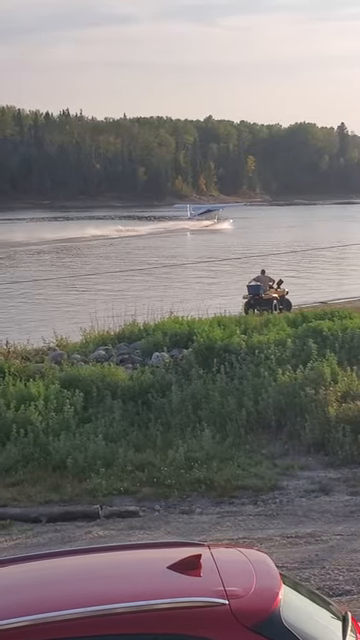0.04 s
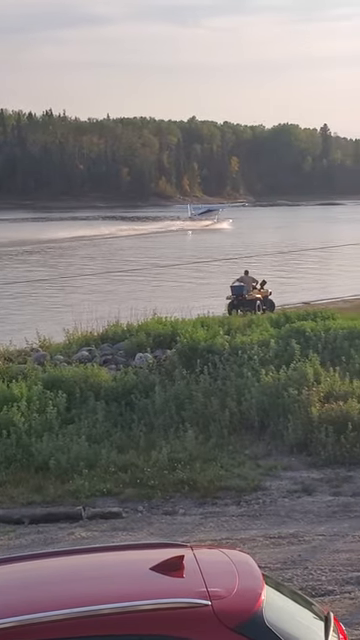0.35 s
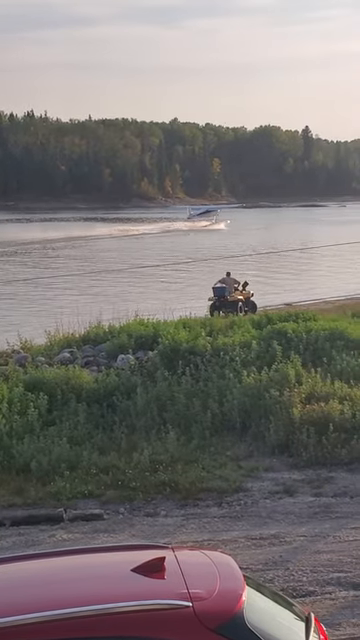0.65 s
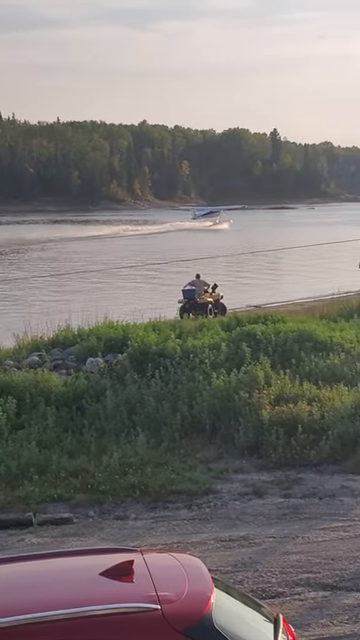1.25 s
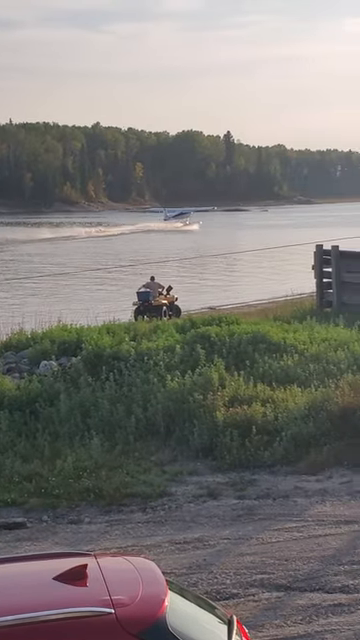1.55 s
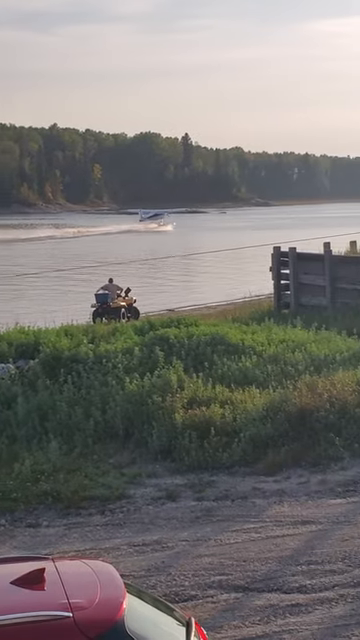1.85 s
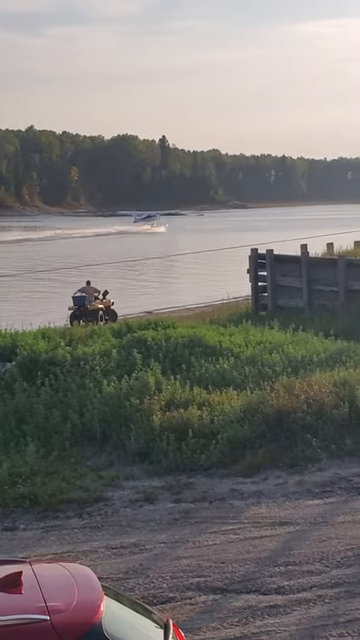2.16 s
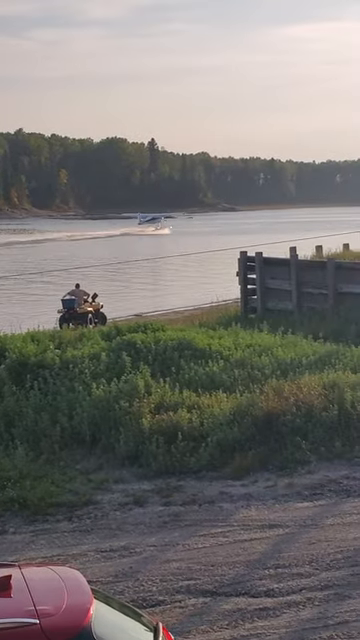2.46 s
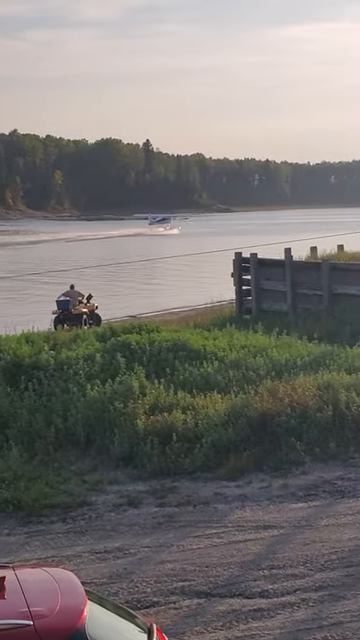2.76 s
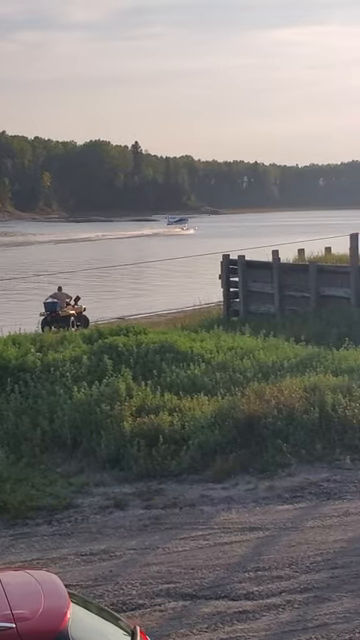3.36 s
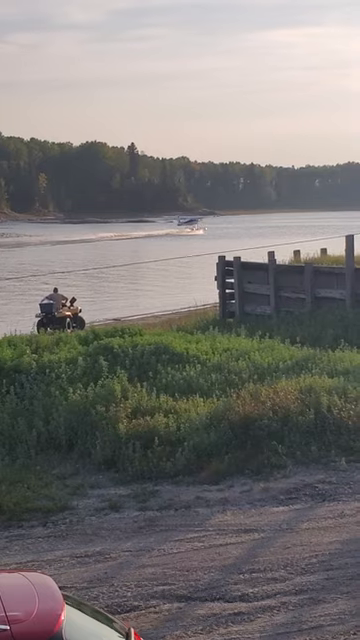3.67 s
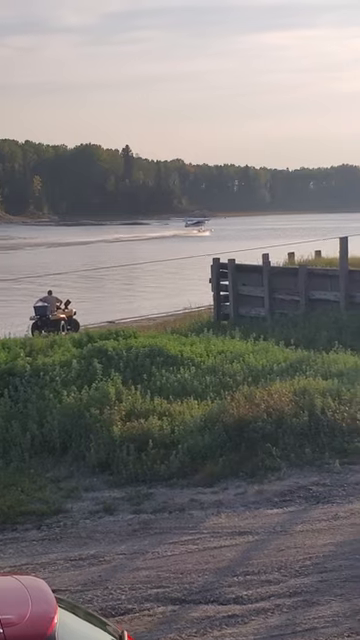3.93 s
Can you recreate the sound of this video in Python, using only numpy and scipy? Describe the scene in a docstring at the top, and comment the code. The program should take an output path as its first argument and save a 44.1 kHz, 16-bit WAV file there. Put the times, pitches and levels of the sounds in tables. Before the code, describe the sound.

Steady propeller drone of a far-off seaplane on the water, with a faint hiss of spray.

```python
"""A floatplane's four-cylinder engine and propeller drone far out on a wide river as it runs to take off.
Heard from the bank, the drone is lowered in pitch because the plane moves away (the Doppler effect),
and it fades in and out. Unequal cylinders add a lumpy beat, and the exhaust rasps with each firing.
The wooded far shore returns the drone higher and smeared, so the two beat against each other.
Beneath them the propeller's wash roars and spray hisses off the floats; a few faint ticks sound nearby."""
import sys
import numpy as np
from scipy import signal
from scipy.fft import rfft, irfft, next_fast_len
from scipy.io import wavfile

SR = 44100
rng = np.random.default_rng(int(sys.argv[2]) if len(sys.argv) > 2 else 0)


def transcribe(signal):
    """Save signal, clipped to [-1, 1], as a 16-bit WAV file at the path in sys.argv[1]."""
    frames = np.atleast_2d(signal).T
    limited = np.clip(frames, -1, 1)
    pcm = np.round(limited * 32767).astype(np.int16)
    wavfile.write(sys.argv[1], SR, pcm)


N = 176400
TIME = np.arange(N) / SR  # seconds
FREQS = np.arange(N // 2 + 1) * SR / N  # Hz

# How often the engine fires and a blade passes, as heard. Each row: time in seconds, rate in Hz.
FIRING_RATE = [(0, 83.19), (.5, 83.22), (1, 83.2), (1.8, 83.08), (2.4, 83.31), (3, 83.15), (3.5, 82.6),
               (4, 82.58)]
# Loudness of the three lowest harmonics (tones at 1, 2 and 3 times the firing rate).
# Each row: time in seconds, level in dB.
FIRST_HARMONIC = [(0, -14.5), (.22, -13.5), (.4, -16), (.54, -21), (.8, -17), (1.1, -18), (1.25, -18),
                  (1.5, -20), (1.65, -17), (1.88, -15), (2.1, -19.5), (2.5, -19.5), (2.68, -22),
                  (2.9, -20.5), (3.3, -19), (3.65, -25.5), (4, -23)]
SECOND_HARMONIC = [(0, -33.5), (.35, -32), (.55, -32.5), (.8, -24), (1.05, -27), (1.251, -22), (1.5, -23),
                   (1.75, -24.5), (2.1, -27), (2.449, -27.5), (2.649, -23), (3.001, -24), (3.3, -21),
                   (3.619, -22.5), (3.77, -19.5), (4, -26)]
THIRD_HARMONIC = [(0, -34), (.25, -29), (.42, -22.5), (.85, -24.5), (1.13, -30.5), (1.26, -22.5),
                  (1.36, -23.5), (1.55, -22), (1.85, -20.5), (2.2, -21.3), (2.5, -22), (2.67, -23.5),
                  (2.799, -22), (3.1, -23.5), (3.5, -25), (3.681, -28.5), (3.8, -21.5), (3.9, -31),
                  (3.96, -21.5)]
# Strength of the higher harmonics. Each row: frequency in Hz, relative level in dB.
BUZZ_COLOUR = [(332, -41), (415, -38.5), (498, -55), (581, -48), (664, -43), (748, -42.5), (880, -51),
               (1250, -55), (1570, -55), (1900, -53.5), (2250, -57.5), (2600, -57.5), (3500, -59)]

def engine_drone(phase):
    """Each blade pass and firing makes a suction pulse: three strong low tones and a buzz above."""
    turn = np.exp(1j * phase)  # turn ** k is harmonic number k
    levels = (FIRST_HARMONIC, SECOND_HARMONIC, THIRD_HARMONIC)
    low = sum(undb(curve(rows)) * turn ** k for k, rows in enumerate(levels, 1))
    mean_hz = np.mean(np.array(FIRING_RATE)[:, 1])
    half_blurred_hz = 1760
    buzz = 0
    for k in range(4, 37):
        blur = (k * mean_hz / half_blurred_hz) ** 2  # churning air blurs high tones most
        fading = (flutter() + blur * wander(width_hz=8)) / np.hypot(1, blur)
        tone = turn ** k * np.exp(2j * np.pi * rng.random())
        buzz += colour(BUZZ_COLOUR, k * mean_hz) * fading * tone
    return -np.sqrt(2) * (low + buzz * undb(-2) * ramp(db_per_s=1.6)).real


# Tones of the lumpy beat. Each row: multiple of a quarter of the firing rate, relative level in dB.
LOPE_TONES = [(3, -40.5), (5, -44), (6, -27.5), (7, -32.5), (9, -46.5), (10, -38.5), (11, -37), (13, -39),
              (14, -58), (15, -40), (18, -39.5), (19, -53.5), (21, -54), (22, -52), (23, -56), (27, -50)]

def cylinder_lope(phase):
    """The four cylinders fire unequally, which adds tones between the drone's harmonics."""
    looseness = 0.48  # 0 gives one stronger knock per cycle, 1 spreads it over the cycle
    peak_s, fall_db_per_s = 2.22, 3
    tones = 0
    for k, db in LOPE_TONES:
        fading = flutter()
        offset = np.pi * (1 + looseness * rng.uniform(-1.01, 1))
        tones += undb(db) * (fading * np.exp(1j * (round(k) * phase / 4 + offset))).real
    return np.sqrt(2) * tones * undb(-2.5 - fall_db_per_s * abs(TIME - peak_s))


# Tone of the exhaust. Each row: frequency in Hz, relative level in dB.
RASP_COLOUR = [(600, -80), (1200, -72.5), (1500, -61), (1750, -66), (1950, -67.5), (2300, -85), (2900, -79),
               (3400, -82), (4500, -90.5), (7000, -100), (12000, -115)]
# How the rasp swells and fades on its way. Each row: time in seconds, gain in dB.
RASP_SWELL = [(0, 0), (.45, 3), (.75, 0), (.95, 1), (1.35, -10.5), (1.8, -4.5), (2.25, -1.5), (2.6, -7),
              (3.2, -1.5), (3.8, -18), (4, -8)]

def exhaust_rasp(phase):
    """Exhaust gas hisses out in one puff per firing."""
    puffs = noise(colour(RASP_COLOUR, FREQS), likeness=0.8) * (1 + 0.46 * np.cos(phase))
    return from_left(puffs, lead_ms=0.19) * undb(curve(RASP_SWELL))


# Strength of the echo's harmonics. Each row: frequency in Hz, relative level in dB.
ECHO_COLOUR = [(86, -35.5), (173, -32.5), (260, -33), (346, -34.5), (432, -43), (519, -45), (605, -42),
               (692, -40.5), (780, -41.5), (865, -43), (1040, -42), (1215, -41), (1300, -45), (1550, -45.5),
               (1900, -47.5), (2400, -70)]
# How the echo's upper growl comes and goes along the bank. Each row: time in seconds, gain in dB.
ECHO_SWELL = [(0, 1.5), (.6, -1), (1.05, -1), (1.4, -0.5), (1.9, -1), (2.3, 0.5), (2.7, 0), (3, -1.5),
              (3.55, 0.5), (3.87, 1.5), (4, 1.5)]

def shore_echo():
    """Countless trees each return the drone at a slightly different pitch: tones become noise bands."""
    pitch_hz, blur_hz, spread_hz = 86.47, 3.24, 0.54
    power = 0
    for k in range(1, 27):
        width_hz = np.hypot(blur_hz, k * spread_hz)  # higher harmonics smear more
        band = bell(FREQS - k * pitch_hz, width_hz) / (width_hz * np.sqrt(2 * np.pi))
        power += colour(ECHO_COLOUR, k * pitch_hz) ** 2 * band
    likeness = 0.92 + 0.08 * np.exp(-(FREQS / 450) ** 4)
    echo = from_left(noise(np.sqrt(power), likeness), lead_ms=0.12) * undb(-1)
    low = filtered(echo, lambda hz: 1 / (1 + (hz / 460) ** 6))
    return low * ramp(db_per_s=-0.35) + (echo - low) * undb(curve(ECHO_SWELL))


# Tone of the air behind the propeller. Each row: frequency in Hz, relative level in dB.
WASH_COLOUR = [(20, -76), (32, -70), (48, -59.5), (100, -59), (200, -55), (300, -65.5), (400, -62.5),
               (480, -68.5), (560, -72.5), (650, -62), (850, -60.5), (1260, -69), (1550, -66),
               (1900, -70.5), (2300, -78), (3000, -85.5), (6000, -115)]

def propeller_wash(phase):
    """Churning air roars, lightly chopped by the blades, and dulls as the plane draws away."""
    roar = noise(colour(WASH_COLOUR, FREQS), likeness=1 / (1 + (FREQS / 2400) ** 2))
    treble = filtered(roar, lambda hz: 1 - np.exp(-(hz / 800) ** 2))
    dulled = roar - treble + treble * ramp(db_per_s=-0.4)
    chopped = dulled * (1 + 0.067 * np.cos(phase))
    return from_left(chopped, lead_ms=0.078) * undb(-2.5)


# Tone of the spray. Each row: frequency in Hz, relative level in dB.
SPRAY_COLOUR = [(500, -82.5), (2000, -83), (2600, -78), (2950, -83.5), (3370, -78.5), (3620, -85),
                (3900, -84), (4200, -86), (4500, -84), (4900, -88.5), (5400, -89.5), (6000, -89.5),
                (6700, -87.5), (7500, -96), (9000, -101), (11400, -102), (12300, -107), (16000, -118)]
# How the spray rises and falls. Each row: time in seconds, gain in dB.
SPRAY_SWELL = [(0, 1), (.3, -1.5), (.9, -1), (1.55, -1), (2, 1.5), (2.7, 2), (2.95, -3.5), (3.25, -1),
               (3.65, -1.5), (4, -1.5)]

def float_spray():
    """The floats hiss over the water; the air soaks up more treble as the plane draws away."""
    hiss = noise(colour(SPRAY_COLOUR, FREQS), likeness=0.44)
    treble = irfft(rfft(hiss) * (1 - np.exp(-(FREQS / 9500) ** 2)), N)
    dulled = hiss - treble + treble * ramp(db_per_s=-4)
    return from_left(dulled, lead_ms=0.232) * undb(curve(SPRAY_SWELL))


# Small dry sounds. Each row: peak time in seconds, level in dB, rise in seconds, decay in seconds.
NEAR_TICKS = [(.7635, -38, .0004, .0014), (.903, -50, .014, .006), (1.0284, -59, .0008, 0.0018)]

def near_ticks():
    """Tiny bursts of very bright noise make faint ticks and a rustle close by."""
    bright = noise(bell(FREQS - 13500, width_hz=2200), likeness=0.1)
    bursts = sum(undb(db) * np.exp(np.minimum((TIME - peak) / rise, (peak - TIME) / decay))
                 for peak, db, rise, decay in NEAR_TICKS)
    return bright / bright.std() * bursts


def undb(db):
    """Turn decibels into a gain to multiply by."""
    return 10 ** (np.asarray(db) / 20)


def ramp(db_per_s):
    """A gain that rises or falls steadily and equals 1 halfway through."""
    return undb(db_per_s * (TIME - TIME.mean()))


def curve(rows):
    """Join rows of time and value with straight lines."""
    return np.interp(TIME, *np.array(rows).T)


def colour(rows, hz):
    """Look up the gain at hz in rows of frequency and dB."""
    row_hz, db = np.array(rows).T
    return undb(np.interp(np.log(np.maximum(hz, 1)), np.log(row_hz), db))


def bell(offset_hz, width_hz):
    """A smooth hump, highest where the offset is zero."""
    return np.exp(-(offset_hz / width_hz) ** 2 / 2)


def noise(gain, likeness):
    """Stereo noise with a gain for each frequency; likeness 1 makes left and right the same."""
    mid, side = rfft(rng.standard_normal((2, N))) * gain * np.sqrt(SR / 2)
    mid, side = mid * np.sqrt((1 + likeness) / 2), side * np.sqrt((1 - likeness) / 2)
    return irfft(np.array([mid + side, mid - side]), N)


def wander(width_hz):
    """Random drift in a tone's strength and phase; a greater width drifts faster."""
    count = 2000
    hz = np.fft.fftfreq(count, N / SR / count)
    white = rng.standard_normal(count) + 1j * rng.standard_normal(count)
    drift = np.fft.ifft(np.fft.fft(white) * bell(hz, width_hz))
    drift /= np.sqrt(np.mean(abs(drift) ** 2))
    return np.interp(np.arange(N) * count / N, np.arange(count), drift)


def flutter():
    """The slow, gentle fading of one tone."""
    return 1 + 0.23 * wander(width_hz=1.8)


def filtered(sound, response):
    """Filter by a gain for each frequency, extending the ends first so they do not click."""
    pad = 4096
    padded = np.pad(np.atleast_2d(sound), ((0, 0), (pad, pad)), mode="reflect", reflect_type="odd")
    padded = padded * signal.windows.tukey(N + 2 * pad, pad / N)
    count = next_fast_len(N + 2 * pad, True)
    hz = np.arange(count // 2 + 1) * SR / count
    return irfft(rfft(padded, count) * response(hz), count)[:, pad:pad + N]


def from_left(sound, lead_ms):
    """Sound from the left reaches the left microphone first."""
    lead_s = np.array([[1], [-1]]) * lead_ms / 1000
    return filtered(sound, lambda hz: np.exp(1j * np.pi * hz * lead_s))


def scene():
    """The plane off to the left, its echo from the shore and the ticks nearby."""
    phase = 2 * np.pi * np.cumsum(curve(FIRING_RATE)) / SR  # one full turn per firing
    engine = from_left(engine_drone(phase) + cylinder_lope(phase), lead_ms=0.15)
    return (engine + shore_echo() + propeller_wash(phase) + exhaust_rasp(phase)
            + float_spray() + near_ticks())


# Each microphone has its own tone. Each row: frequency in Hz, left level minus right level in dB.
MIC_BALANCE = [(80, 0.5), (140, 1.5), (230, -2), (330, -5), (490, 8.5), (750, -2), (1150, -1), (1750, -6),
               (2700, -1.5), (4000, 3.5), (8000, 1.5), (10500, 6.5), (13000, -1.5)]

def record(dry):
    """Two microphones colour the sound; the highest treble is cut and both ends fade briefly."""
    top_hz, fade_s = 15700, 0.004
    sides = np.array([[0.5], [-0.5]])  # each side takes half of the balance
    heard = filtered(dry, lambda hz: colour(MIC_BALANCE, hz) ** sides / (1 + (hz / top_hz) ** 200))
    return heard * signal.windows.tukey(N, 2 * fade_s * SR / N)


dry = scene()
out = record(dry)
transcribe(out)
```